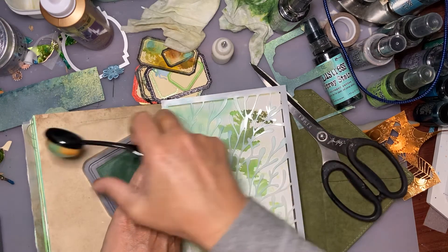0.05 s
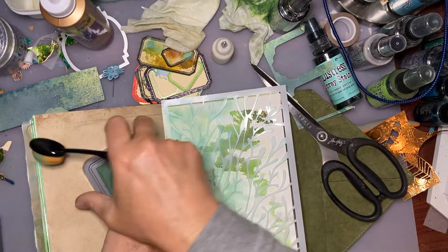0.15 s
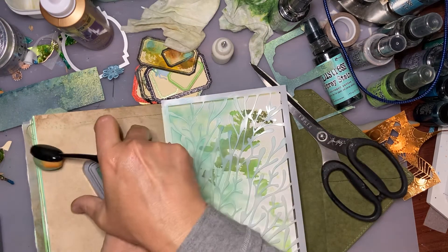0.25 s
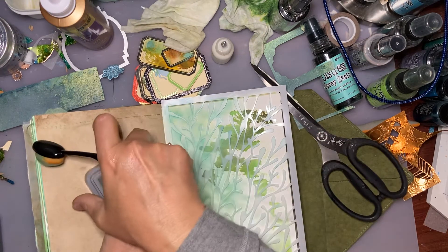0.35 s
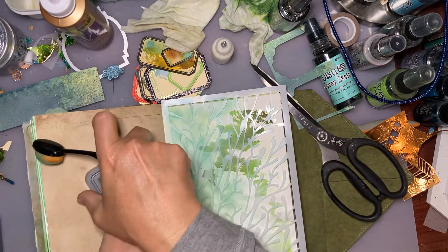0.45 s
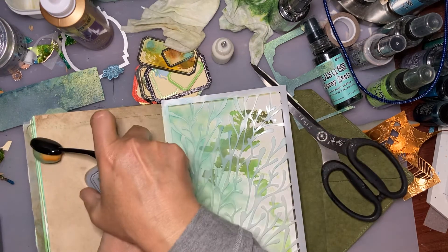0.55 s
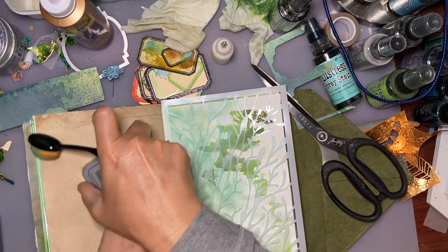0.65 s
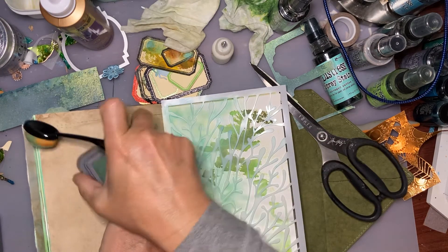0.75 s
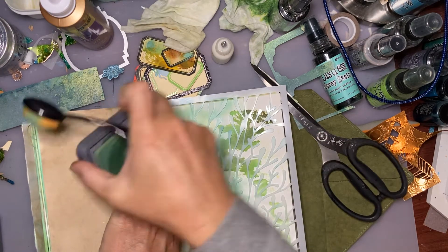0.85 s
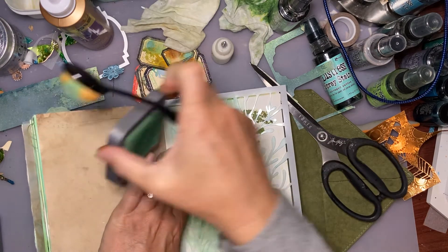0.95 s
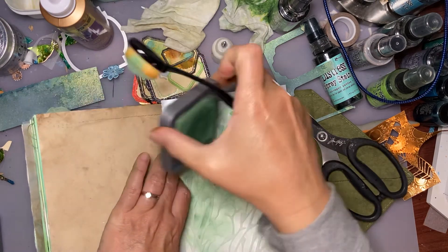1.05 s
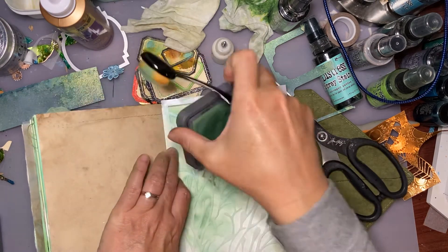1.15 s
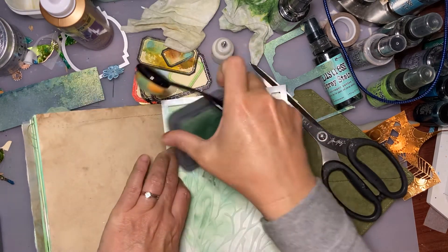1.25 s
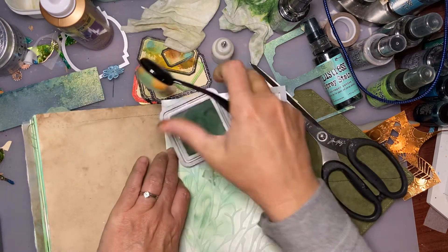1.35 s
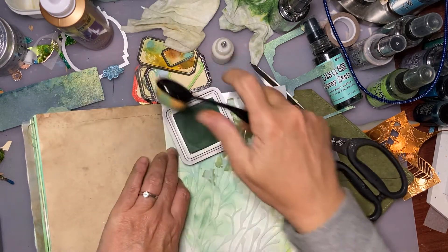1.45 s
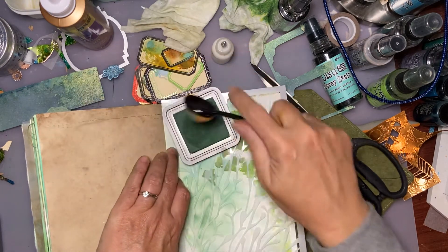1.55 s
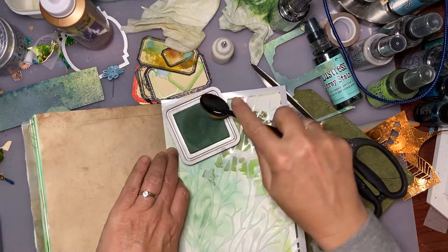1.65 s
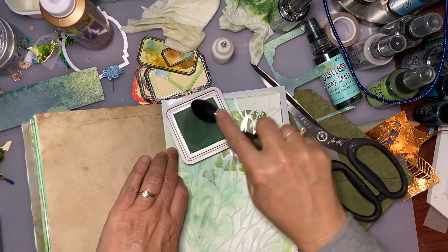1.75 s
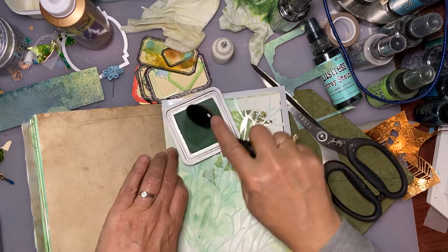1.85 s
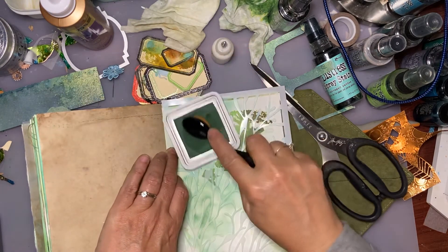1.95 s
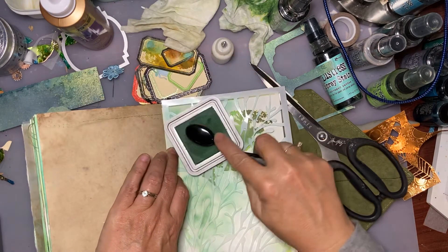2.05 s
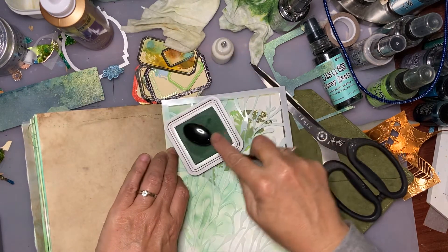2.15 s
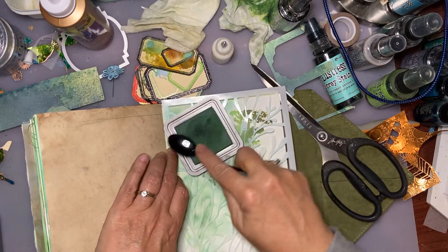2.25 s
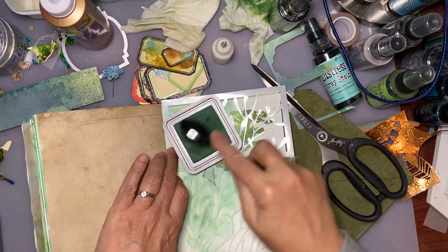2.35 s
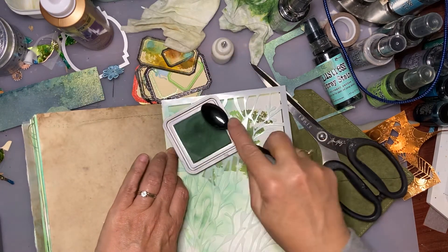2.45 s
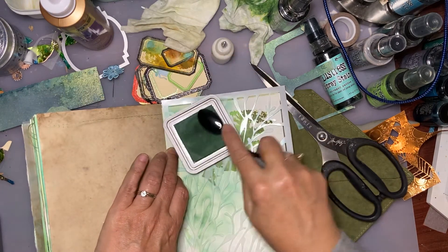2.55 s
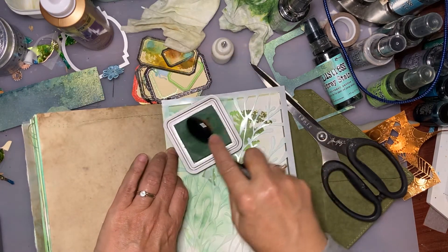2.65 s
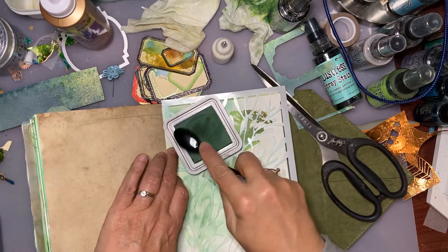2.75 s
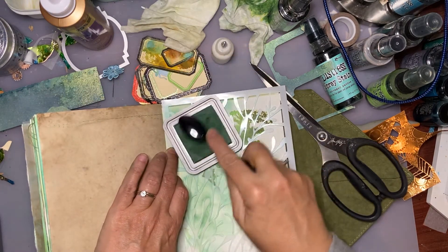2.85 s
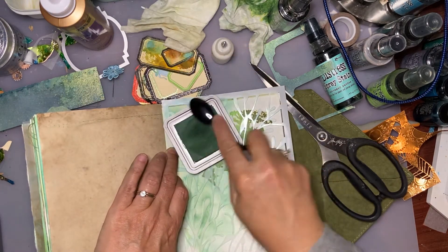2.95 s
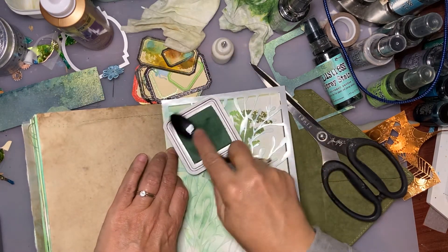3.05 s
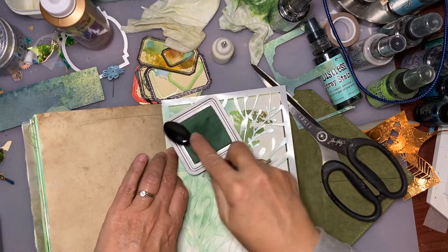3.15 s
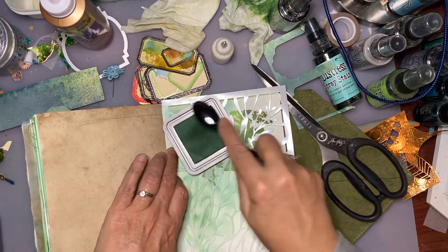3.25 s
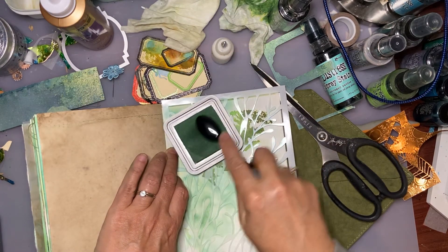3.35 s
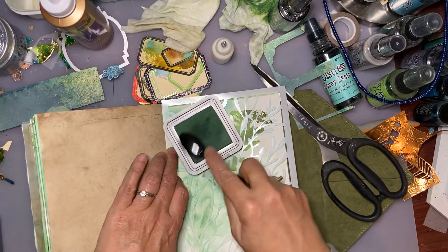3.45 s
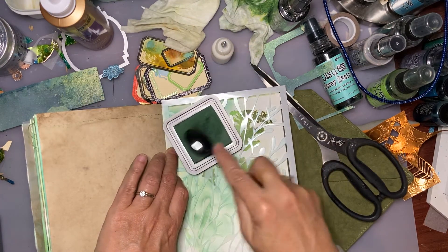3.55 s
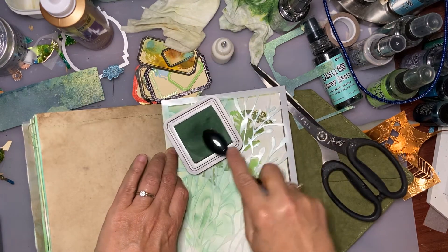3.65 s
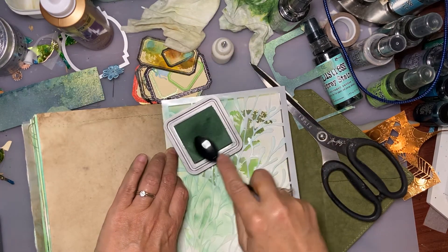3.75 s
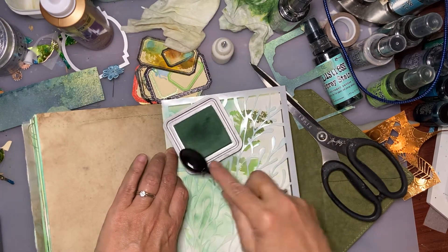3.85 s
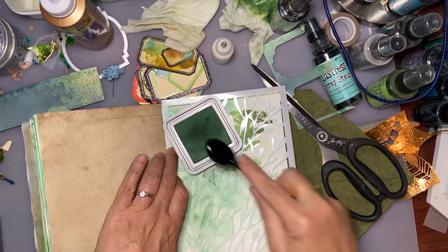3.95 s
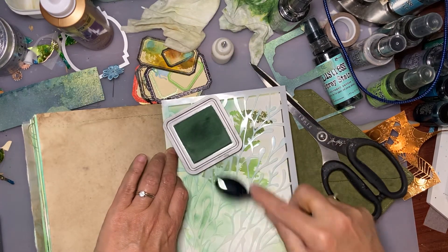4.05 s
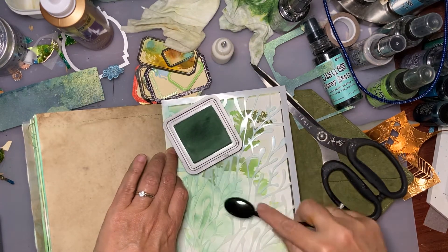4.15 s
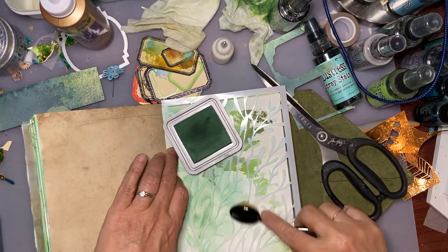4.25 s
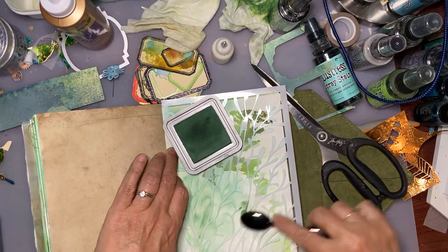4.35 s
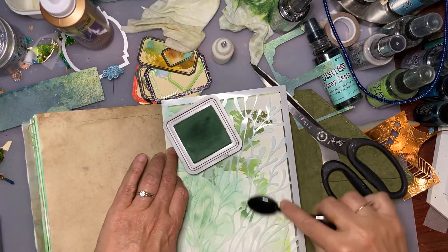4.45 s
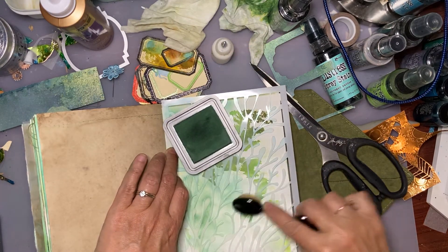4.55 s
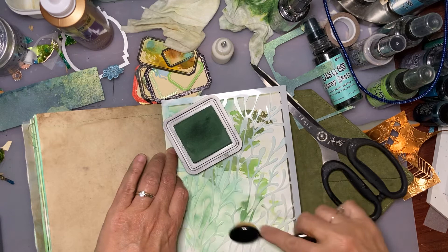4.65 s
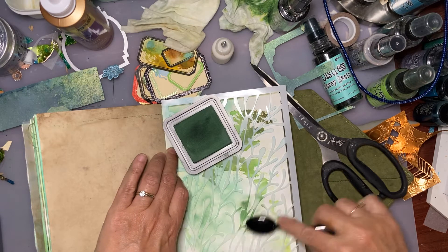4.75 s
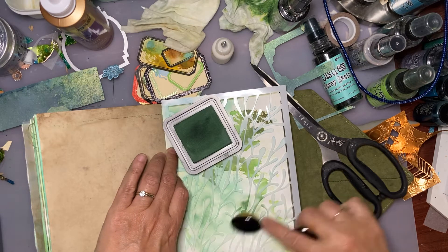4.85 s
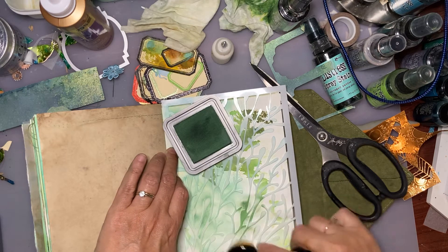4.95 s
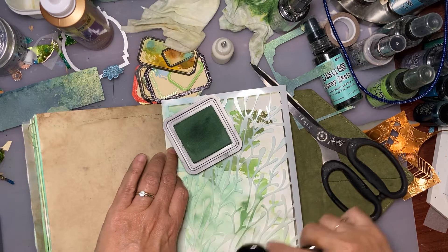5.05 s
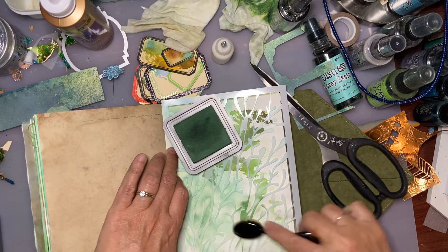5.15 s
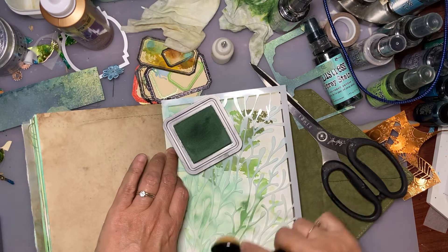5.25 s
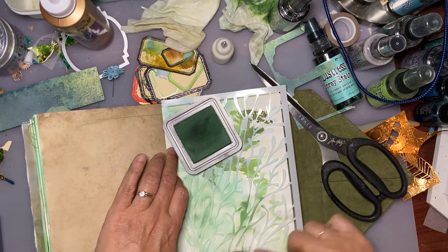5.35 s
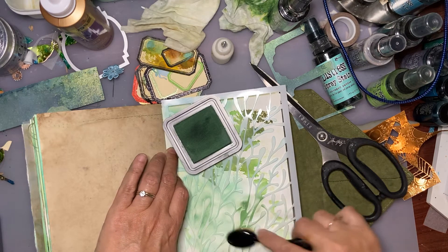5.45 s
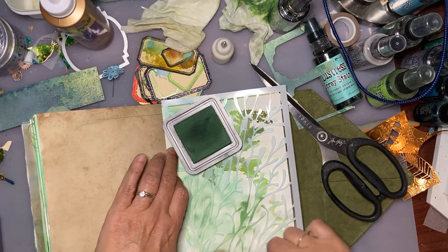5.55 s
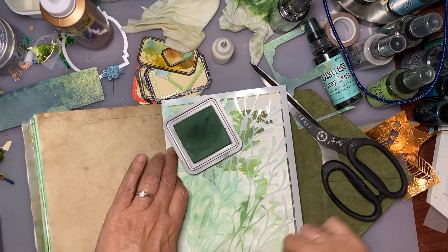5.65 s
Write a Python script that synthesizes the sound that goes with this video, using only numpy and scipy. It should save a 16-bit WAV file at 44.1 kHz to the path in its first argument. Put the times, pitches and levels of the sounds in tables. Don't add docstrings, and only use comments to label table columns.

```python
import sys
import numpy as np
from scipy import signal
from scipy.fft import rfft, irfft, next_fast_len
from scipy.io import wavfile
from scipy.ndimage import uniform_filter1d

SR = 44100
rng = np.random.default_rng(int(sys.argv[2]) if len(sys.argv) > 2 else 0)


def waveform_to_disk(signal):
    frames = np.transpose(np.atleast_2d(signal))
    scaled = np.clip(frames, -1, 1) * 32767
    samples = np.round(scaled).astype(np.int16)
    wavfile.write(sys.argv[1], SR, samples)


def attenuation_scalar(level_db):
    decades = np.asarray(level_db, float) / 20
    return 10 ** decades


N = 250929
SIZE = next_fast_len(N)
HZ = np.fft.rfftfreq(SIZE, 1 / SR) + 1e-3
TIME_S = np.arange(N) / SR

# touch in seconds, rise in seconds, level in dB, lift in seconds, level at lift in dB.
LID_SLIDES = [
    (0.035, 0.011, -72.5, 0.054, -82),
    (0.252, 0.024, -67.5, 0.29, -60),
    (.29, 0.012, -64, 0.33, -70.5),
    (0.563, 0.028, -62.5, 0.66, -66.5),
    (0.668, 0.015, -58, 0.7345, -56),
    (0.721, 0.017, -55, 0.76, -61.5),
]
PAD_SLIDES = [
    (1.196, 0.0093, -63, 1.284, -70.5),
    (1.24, 0.011, -60, 1.25, -63),
    (1.288, 0.0073, -53, 1.329, -49),
    (1.319, 0.0086, -51.5, 1.415, -60),
]
RASPS = [
    (1.825, 0.01, -73.5, 1.9, -72),
    (1.911, 0.022, -69.5, 1.96, -63),
]
PRESSES = [
    (1.93, 0.032, -66, 1.996, -66),
    (2.218, 0.011, -72.5, 2.324, -65.5),
    (2.503, 0.0093, -74, 2.545, -65),
    (2.925, 0.016, -60, 3.016, -69),
    (3.13, 0.0074, -66.5, 3.18, -79),
    (3.307, 0.0077, -66, 3.37, -59.5),
    (3.641, 0.0097, -65.5, 3.72, -64),
    (3.791, 0.029, -75, 3.843, -70),
    (4.54, 0.015, -77, 4.65, -75.5),
    (5.16, 0.034, -75.5, 5.3, -79),
]
SWEEPS = [
    (0.79, .03, -86, 0.87, -72.5),
    (0.9, 0.03, -66, 0.9, -66),
    (1.74, 0.017, -80.5, 1.83, -78.5),
    (2.099, 0.051, -66, 2.193, -65.5),
    (2.56, 0.039, -67.5, 2.743, -69),
    (2.76, .02, -87, 2.93, -86),
    (2.97, 0.06, -70.5, 3.092, -70.5),
    (3.34, .02, -64, 3.44, -65),
    (3.71, 0.028, -66, 3.79, -75),
]
# time in seconds, level in dB.
CIRCLE_PRESSURE = [(4.18, -89), (4.188, -68.5), (4.428, -62.5), (4.478, -70.5), (4.544, -64.5),
                   (5.504, -64), (5.6, -58), (5.638, -70), (5.69, -51.5)]
# time in seconds, peak in dB, board ring in dB, board ring in Hz, hollow ring in dB.
LID_TICKS = [
    (0.0416, -41, -19, 680, -14.5),
    (0.19, -68.5, -3, 600, 8.5),
    (0.2614, -50, 4, 650, -10),
    (0.263, -57.5, 11, 1145, -10),
    (0.299, -50, 5.5, 1110, -12),
    (0.389, -74, 17, 1165, 1),
    (0.4834, -66.5, -12, 781, -9),
    (0.6, -64, 14, 1174, -3),
    (0.7244, -73, -17, 980, -2),
    (0.7644, -58, -2, 880, -6),
]
PAD_KNOCKS = [(1.2052, -39.5, -1, 1076, -9.5), (1.2456, -38, -4.5, 810, -24), (1.2964, -24, -5, 1020, -5),
              (1.3153, -29.5, -15, 900, -5), (1.3234, -21.5, -9, 860, -13), (1.3494, -29.5, -13, 850, -10),
              (1.3834, -33, -10, 854, -10), (1.4157, -38.5, -15, 935, -7), (1.5678, -59, -9, 635, -17),
              (1.7639, -58, -4.5, 950, -7), (1.8387, -55, -8, 940, 0), (1.8643, -52, 0, 840, 0),
              (1.8894, -55.5, 11, 800, 4), (1.9248, -49.5, -2, 920, 4.5), (1.9804, -52, 23, 942, -13),
              (2.368, -51, -23, 743, -12), (2.848, -63.5, -22, 800, -18)]
PAD_DABS = [(0.923, -54, -9, 680, -9), (2.0373, -46, -10.5, 867, -27), (2.0847, -55.5, -4, 820, -6),
            (2.2304, -56.5, 5, 974, 0.5), (2.2946, -36.5, -11.5, 856, -13), (2.355, -45, -16.5, 770, -15),
            (2.5084, -59.5, 7.5, 1080, -14), (2.5385, -46.5, 1, 1074, -7.5), (2.7751, -58.5, -7, 1180, -5),
            (2.786, -52.5, -19, 605, -4.5), (2.8142, -56.5, -22, 791, -13), (2.8777, -59.5, -11, 773, -24),
            (2.933, -44, -1.5, 1075, -7), (2.9594, -53, 5, 820, 2), (3.1369, -38, -32, 870, -15),
            (3.1744, -59, -9, 619, -6), (3.3177, -44, -2, 1010, -9.5), (3.3477, -32.5, -13, 1000, -20),
            (3.4697, -45.5, -11.5, 870, -1.5), (3.6451, -45, 0, 920, -11),
            (3.6748, -40, -10.5, 1055, -11.5), (3.7188, -57, 1, 1140, 3), (3.8137, -47.5, -32, 956, -7)]
STENCIL_DABS = [
    (4.1874, -57.5, -14, 1220, -2),
    (4.2163, -47.5, -15, 690, -1.5),
    (4.4114, -45, -14.5, 800, -4.5),
    (4.5487, -53, -14, 800, 4.5),
    (4.7894, -51, -33, 853, 0.5),
    (5.1791, -53.5, 8, 895, -22),
    (5.2994, -55.5, -3, 820.7, -2),
]
# time in seconds, peak in dB, pitch in Hz, T60 in seconds.
THUDS = [(0.248, -42.5, 75, 0.17), (1.263, -20, 128.5, 0.075), (1.285, -33.5, 128, 0.15),
         (1.3044, -12.5, 129.5, 0.098), (4.456, -42, 74, 0.14), (5.09, -42.5, 75, .15),
         (1.333, -28.5, 153, 0.22), (1.361, -28, 136.4, 0.15), (1.844, -42, 183, 0.14),
         (2.322, -48, 75.6, 0.25), (2.549, -45, 79.3, 0.19), (2.937, -35, 136, 0.095),
         (3.321, -41, 163, 0.14), (3.654, -44.5, 115.6, 0.33), (5.373, -35.5, 76.3, 0.19),
         (5.419, -41, 115, 0.31)]
# time in seconds, rumble in dB.
RUMBLE_LEVEL = [(0.0, -59), (0.62, -55), (1.11, -57.5), (1.38, -53.5), (1.66, -57), (2.31, -57),
                (2.39, -54.5), (2.74, -58.5), (3.01, -54), (3.55, -55), (3.69, -58), (4.29, -60),
                (4.55, -58.5), (4.79, -58.5), (5.21, -60.5), (5.69, -56.5)]
# frequency in Hz, density in dB per Hz.
RUMBLE_TONE = [(12, -61), (20, -40.5), (32, -27.5), (52, -8), (69, -3), (97, -6), (140, -1.5), (158, -9.5),
               (173, -16.5), (188, -12), (209, -7), (238, -30.5), (330, -39.5), (430, -52.5), (730, -120)]
BRISTLE_TONE = [(250, -22.5), (450, -14), (700, -17.5), (1000, -11), (1500, -6), (2500, -6), (4000, 1),
                (5500, -0.5), (7000, -4.5), (9000, 2), (11500, -5), (13500, -8), (15600, -9), (15900, -40),
                (17000, -68)]
HISS_TONE = [(150, -43.5), (250, -8.5), (316, -10.5), (356, -13.5), (394, -13.5), (653, -15.5), (760, -12),
             (1160, -19), (1280, -20.5), (9190, -28.5), (10700, -19), (14000, -41)]
# frequency in Hz, lead in
PORT_PHASE = [(0, 0), (2000, 0), (3200, -.5), (5400, -.85), (6800, -.05), (7300, .05), (8750, .96),
              (9400, 1.04), (11150, 1.96), (11700, 2.05), (13250, 2.96), (14200, 3.05), (15450, 3.96),
              (17000, 4.2)]
# frequency in Hz, likeness 0-1.
PORT_LIKENESS = [(60, .965), (200, .96), (350, .65), (800, .75), (1400, .35), (2500, .55), (4000, .4),
                 (5500, .72), (6300, .5), (7000, .93), (8500, .972)]
# frequency in Hz, difference in dB.
PORT_LEFT = [(60, 1.3), (300, 2), (1200, 4.5), (2500, 2), (4500, .5), (6000, 0)]

FLICKS_PER_S, FLICK_SPREAD_DB, PATCHY_DB = 2200, 2.5, 2.6
BOARD_HZ, BOARD_WIDTH_HZ = 920, 330
LID_RING_HZ, LID_RING_WIDTH_HZ = 1140, 250
HOLLOW_WIDTH_HZ = 1300
LID_HZ, LID_OPENS_HZ_PER_S = 2655, 1350
PAD_HZ, BRUSH_HZ, STENCIL_HZ = 2254, 1890, 2247
RISE_DB, GONE_DB, CIRCLES_DB = 22, 40, -3
UPPER_DB, SHAKE_DB, SHAKE_T60_S = -3, -21, 0.252
ROOM_T60_S, ROOM_DB = 0.17, -13
HISS_DB = -78


def on_hz(table):
    hz, value = np.transpose(table)
    return np.interp(np.log(HZ), np.log(np.maximum(hz, 1)), value)


def unit(x):
    return x / np.sqrt(np.mean(x ** 2))


def shaped(x, gain):
    return unit(irfft(rfft(x, SIZE) * gain, SIZE)[:N])


def noise():
    return rng.standard_normal(N)


def resonance(hz, width_hz):
    return 1 / (1 + ((HZ ** 2 - hz ** 2) / (HZ * width_hz)) ** 2)


def walk(rate_hz):
    k = int(SR / rate_hz)
    steps = np.repeat(rng.standard_normal(N // k + 1), k)
    return 1.45 * uniform_filter1d(uniform_filter1d(steps, k), k)[:N]


def add(out, start_s, x):
    i = int(start_s * SR)
    out[i:i + len(x)] += x[:N - i]


def flicks():
    size = attenuation_scalar(FLICK_SPREAD_DB * np.minimum(rng.exponential(size=N), 3))
    clicks = (rng.random(N) < FLICKS_PER_S / SR) * size
    return unit(clicks * noise()) + 1.34 * noise()


def bristle_contact():
    centres_hz = np.geomspace(500, 14000, num=20)
    spectrum, patchy = rfft(flicks(), SIZE), 0
    for k in range(len(centres_hz)):
        band = np.interp(np.log(HZ), np.log(centres_hz), np.arange(len(centres_hz)) == k)
        patchy = patchy + irfft(spectrum * band, SIZE)[:N] * attenuation_scalar(PATCHY_DB * walk(35))
    tone = attenuation_scalar(on_hz(BRISTLE_TONE))
    is_air = HZ > 9000
    slow = 1 / (1 + (2 * HZ / HOLLOW_WIDTH_HZ) ** 2)
    flutter = shaped(flicks(), slow) + 1j * shaped(noise(), slow)
    rustle = shaped(patchy, tone * ~is_air)
    board = shaped(patchy, resonance(BOARD_HZ, BOARD_WIDTH_HZ))
    return rustle, board, shaped(patchy, tone * is_air), flutter


def strokes(rows, release_db_per_s):
    release_s = GONE_DB / release_db_per_s
    return [[(touch, db - RISE_DB), (touch + rise, db), (lift, lift_db), (lift + release_s, lift_db - GONE_DB)]
            for touch, rise, db, lift, lift_db in rows]


def drag(contact, curves, board_db, hollow_db, air_db, hollow_hz):
    rustle, board, air, flutter = contact
    level = sum(attenuation_scalar(np.interp(TIME_S, *np.transpose(c), left=-200, right=-200)) for c in curves)
    phase = 2 * np.pi * np.cumsum(hollow_hz + 0 * TIME_S) / SR
    hollow = np.real(flutter * (np.exp(1j * phase) + 0.29 * np.exp(1.5j * phase)))
    hollow += 0.35 * np.imag(flutter * np.exp(0.62j * phase))
    mix = 1.607 * rustle + 0.49 * attenuation_scalar(board_db) * board
    mix += 0.83 * attenuation_scalar(hollow_db) * hollow + 1.81 * attenuation_scalar(air_db) * air
    return level * mix


def rubbing(contact):
    rustle, _, air, flutter = contact
    lid_contact = rustle, shaped(rustle, resonance(LID_RING_HZ, LID_RING_WIDTH_HZ)), air, flutter
    lid_hz = LID_HZ + LID_OPENS_HZ_PER_S * TIME_S
    out = drag(lid_contact, strokes(LID_SLIDES, 906), board_db=-1, hollow_db=10, air_db=-6, hollow_hz=lid_hz)
    out += drag(contact, strokes(PAD_SLIDES, 421), board_db=6.5, hollow_db=5.5, air_db=-6.5, hollow_hz=PAD_HZ)
    out += drag(contact, strokes(RASPS, 500), board_db=-4, hollow_db=11.5, air_db=-4.5, hollow_hz=2415)
    out += drag(contact, strokes(PRESSES, 305), board_db=5, hollow_db=0.5, air_db=-4.5, hollow_hz=2527)
    out += drag(contact, strokes(SWEEPS, 366), board_db=-7.5, hollow_db=-45, air_db=1.5, hollow_hz=3400)
    circles = drag(contact, [CIRCLE_PRESSURE], board_db=-7.5, hollow_db=-7, air_db=-1, hollow_hz=2610)
    out += attenuation_scalar(CIRCLES_DB) * circles
    return out * attenuation_scalar(1.34 * walk(25.07) + 0.97 * walk(90))


def dabs(contact):
    rustle, board, air, flutter = contact
    t = np.arange(SR // 5) / SR
    crack = np.minimum(t / 0.00029, 1) * (attenuation_scalar(-60 * t / 0.039) + attenuation_scalar(-60 * t / 0.023))
    swell = np.minimum(t / 0.004, 1) * attenuation_scalar(-60 * t / 0.033)
    paper = np.minimum(t / 0.0061, 1) * attenuation_scalar(-60 * t / 0.11)
    crack_env, stack_env, case_ring, board_ring, snap_env = np.zeros((5, N))
    touches = [(*r, LID_HZ + LID_OPENS_HZ_PER_S * r[0]) for r in LID_TICKS]
    for rows, hollow_hz in ((PAD_KNOCKS, PAD_HZ), (PAD_DABS, BRUSH_HZ), (STENCIL_DABS, STENCIL_HZ)):
        touches += [(*r, hollow_hz) for r in rows]
    for s, db, board_db, board_hz, hollow_db, hollow_hz in touches:
        add(crack_env, s, attenuation_scalar(db - 13) * crack)
        add(stack_env, s, attenuation_scalar(db + min(board_db, 0) - 12) * paper)
        add(board_ring, s, attenuation_scalar(db + board_db - 1.5) * swell * np.sin(2 * np.pi * board_hz * t))
        add(case_ring, s, attenuation_scalar(db + hollow_db + 4.5) * swell * np.sin(2 * np.pi * hollow_hz * t))
    for s, db, board_db, _, _ in PAD_DABS:
        add(snap_env, s, attenuation_scalar(db - 20.5 - max(board_db, -12) - 60 * t / 0.0098))
    out = crack_env * (rustle + 0.57 * air + 0.17 * board)
    out += snap_env * (air + 0.5 * rustle)
    out += stack_env * shaped(noise(), resonance(388, 357))
    return out + board_ring + case_ring * (0.69 + 0.85 * flutter.imag)


def thuds():
    t, out = np.arange(SR // 2) / SR, np.zeros(N)
    for s, db, hz, t60_s in THUDS:
        modes = np.sin(2 * np.pi * hz * t)
        modes += 0.21 * attenuation_scalar(-60 * t / 0.14) * np.sin(2 * np.pi * 1.536 * hz * t)
        modes += 0.18 * np.sin(2 * np.pi * 0.58 * hz * t)
        add(out, s, attenuation_scalar(db) * np.minimum(t / 0.0059, 1) * attenuation_scalar(-60 * t / t60_s) * modes)
    return out


def rumble():
    level_db = np.interp(TIME_S, *np.transpose(RUMBLE_LEVEL))
    t, shake = np.arange(SR // 2) / SR, np.zeros(N)
    for s, thud_db, _, _ in THUDS:
        add(shake, s, attenuation_scalar(thud_db + SHAKE_DB - 60 * t / SHAKE_T60_S) * np.minimum(t / 0.015, 1))
    tone = attenuation_scalar(on_hz(RUMBLE_TONE))
    deep_share = 1 / (1 + (HZ / 110) ** 8)
    deep = shaped(noise(), tone * deep_share) * attenuation_scalar(3 * walk(12))
    upper = shaped(noise(), tone * (1 - deep_share)) * attenuation_scalar(3 * walk(12))
    return deep * attenuation_scalar(level_db) + upper * (attenuation_scalar(level_db + UPPER_DB) + shake)


def hiss():
    tone = attenuation_scalar(on_hz(HISS_TONE) - 1) * (HZ < 14400) + attenuation_scalar(-18.5) * resonance(10500, 500)
    return attenuation_scalar(HISS_DB) * np.array([shaped(noise(), tone) for _ in range(2)])


def room(x):
    t = np.arange(SR // 3) / SR
    tail = rng.standard_normal(len(t)) * attenuation_scalar(-60 * t / ROOM_T60_S) * np.minimum(t / 0.0016, 1)
    tail = rfft(tail * attenuation_scalar(ROOM_DB) / np.sqrt(np.sum(tail ** 2)), SIZE)
    smear = rfft(rng.standard_normal((2, len(t))) * attenuation_scalar(-60 * t / 0.043), SIZE)
    smear /= uniform_filter1d(np.abs(smear), size=1200)
    direct, path_a, path_b = irfft(rfft(x, SIZE) * np.array([1 + tail, *smear]), SIZE)[:3, :N]
    pose = 2 * np.pi * (TIME_S + 0.5 * walk(4))
    return np.array([direct, np.cos(pose) * path_a + np.sin(pose) * path_b])


def ports(pair):
    like = on_hz(PORT_LIKENESS)
    turn = np.exp(-0.5j * np.pi * np.interp(HZ, *np.transpose(PORT_PHASE)))
    lean = attenuation_scalar(on_hz(PORT_LEFT) / 2)
    same, apart = rfft(pair, SIZE) * np.sqrt(np.array([1 + like, 1 - like]) / 2)
    left = (same + apart) * turn * lean
    right = (same - apart) / turn / lean
    return irfft(np.array([left, right]), SIZE)[:2, :N]


def scene():
    contact = bristle_contact()
    table = rubbing(contact) + dabs(contact) + thuds() + rumble()
    return ports(room(table) + hiss())


def low_pass(x):
    return signal.sosfilt(signal.butter(12, 17030, fs=SR, output="sos"), x)


def record(dry):
    dry = signal.sosfilt(signal.butter(3, 40, "high", fs=SR, output="sos"), dry)
    return low_pass(np.tanh(2.956 * dry) / 3.05)


dry = scene()
out = record(dry)
waveform_to_disk(out)
```